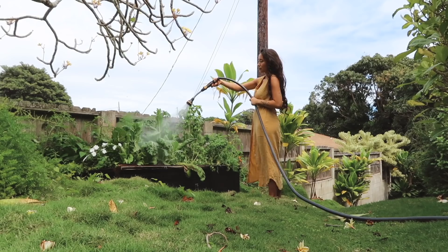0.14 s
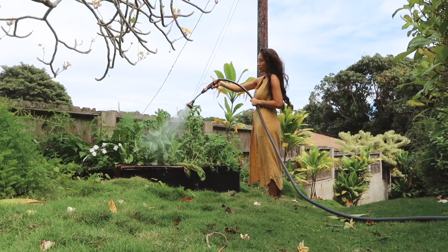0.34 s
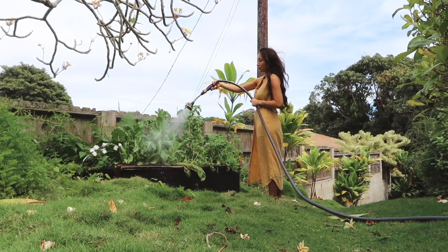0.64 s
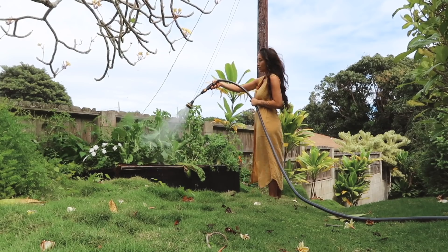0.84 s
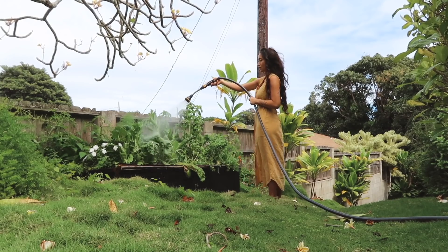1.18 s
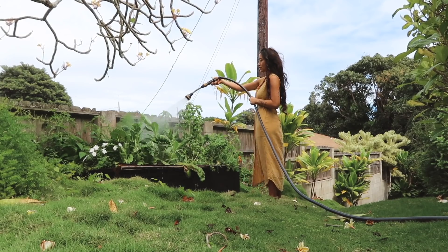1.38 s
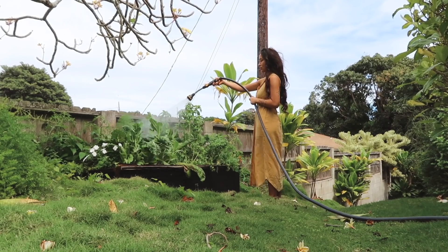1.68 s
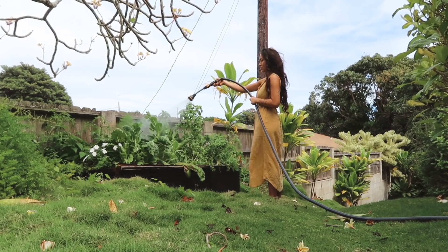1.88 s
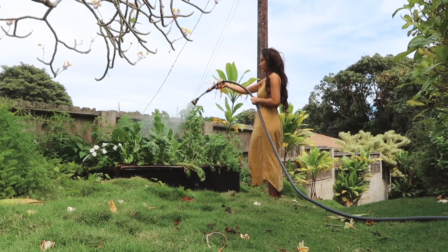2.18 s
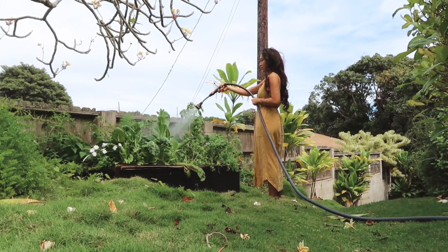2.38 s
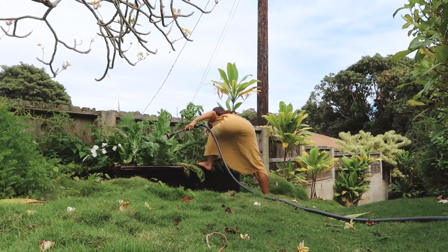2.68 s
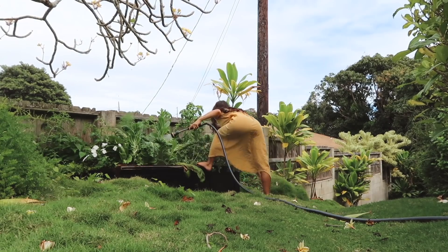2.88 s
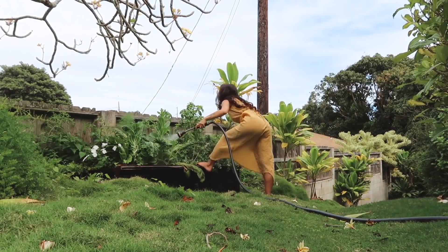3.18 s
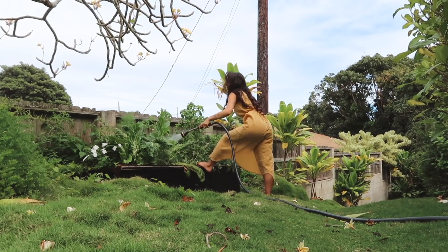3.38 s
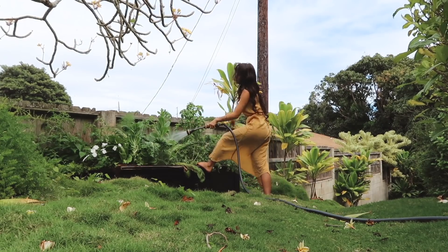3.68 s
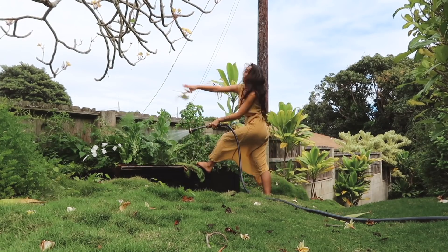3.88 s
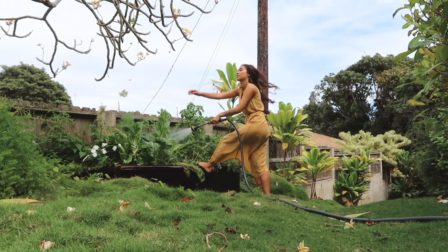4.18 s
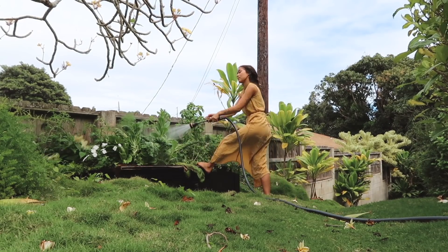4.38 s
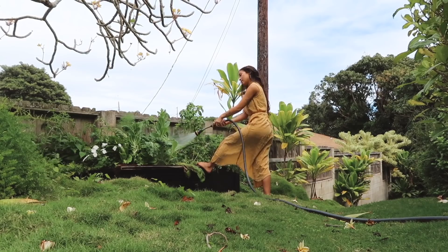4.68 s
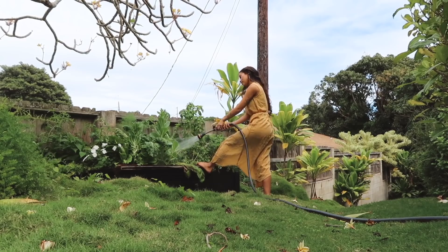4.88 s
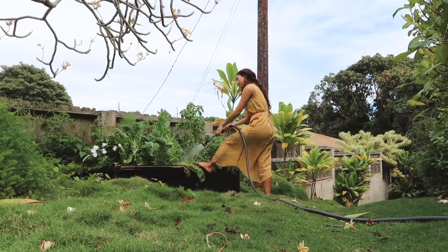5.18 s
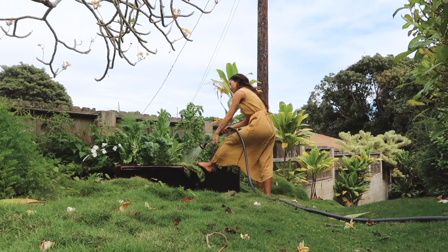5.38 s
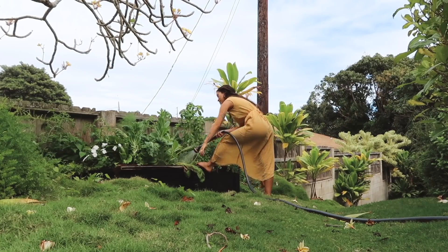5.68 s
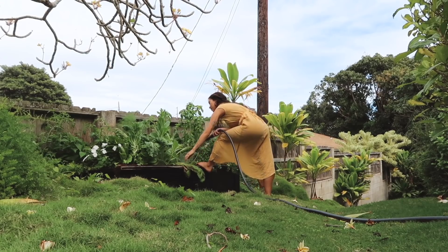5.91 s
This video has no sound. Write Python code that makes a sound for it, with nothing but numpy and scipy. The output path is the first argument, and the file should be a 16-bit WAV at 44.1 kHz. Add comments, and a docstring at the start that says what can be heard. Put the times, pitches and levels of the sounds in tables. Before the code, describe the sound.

Water from a hose nozzle patters densely on leafy plants under a fine hiss, then sizzles lower in the bed and thins out.

```python
"""Six seconds in a garden: a hose nozzle sprays leafy plants a few metres from the microphone.
From the start drops patter on leaves, a noise of random impacts, under hissing mist; fat drops slap, as short rings.
Far traffic rumbles, a filtered noise, with thin whines, engine notes that swell and sink, and puffs of wind.
Past four seconds the nozzle dips: the jet sizzles in the bed, resonances on dense impacts, and then the patter thins."""
import sys
import numpy as np
from scipy import signal
from scipy.fft import rfft, irfft
from scipy.io import wavfile
from scipy.ndimage import uniform_filter1d

SR = 44100
rng = np.random.default_rng(int(sys.argv[2]) if len(sys.argv) > 2 else 0)


def transcribe(u):
    """Save the signal u as a 16-bit wav file named by the first command-line argument.

    u: samples, shape (n,) or (channels, n), limited to [-1, 1]; the rate is SR.
    q: integer samples, one column per channel.
    """
    v = np.clip(np.atleast_2d(u).T, -1, 1)
    q = np.round(v * 32767).astype(np.int16)
    wavfile.write(sys.argv[1], SR, q)


N = 266760  # samples


def gain_of(db):
    """Decibels to amplitude."""
    return 10 ** (np.asarray(db) / 20)


def evened(x):
    """Scales to rms 1."""
    return x / np.sqrt(np.mean(x ** 2) + 1e-20)


def read(points, hz):
    """Reads a spectrum table on a log-frequency axis."""
    f, value = np.transpose(points)
    return np.interp(np.log(hz + 1), np.log(f + 1), value)


def follow(rows, t=None):
    """The columns of a curve at the times t, by default at every sample."""
    s, *columns = np.transpose(rows)
    if t is None:
        t = np.arange(N) / SR
    return [np.interp(t, s, column) for column in columns]


def wander(hz):
    """Slow chance of rms 1, up to about hz changes a second."""
    f = np.fft.rfftfreq(N, 1 / SR)
    spectrum = rfft(rng.standard_normal(N)) / (1 + (f / hz) ** 4)
    return evened(irfft(spectrum, N))


def coloured(x, colour):
    """Gives a sound a spectrum, at rms 1."""
    gain = gain_of(read(colour, np.fft.rfftfreq(N, 1 / SR)))
    return evened(irfft(rfft(x) * gain, N))


def pair(x, same):
    """Two unrelated sounds become left and right, from alike (1) through unrelated (0) to opposite (-1)."""
    likeness = np.clip(read(same, np.fft.rfftfreq(N, 1 / SR)), -1, 1)
    mid = rfft(x[0]) * np.sqrt(1 + likeness)
    side = rfft(x[1]) * np.sqrt(1 - likeness)
    return irfft(np.array([mid + side, mid - side]), N)


def drops(per_s, spread_db):
    """Random impacts: a positive spread makes a few larger than the rest, a negative one a few smaller."""
    size = gain_of(spread_db * np.minimum(rng.exponential(1, N), 5))
    sign = rng.choice([-1, 1], N)
    lands = rng.random(N) < per_s / SR
    return evened(size * sign * lands)


def resonate(x, hz, width):
    """A resonance of gain 1, width in Hz, that follows the curve hz."""
    turn = np.exp(2j * np.pi * np.cumsum(hz * np.ones(N)) / SR)
    r = np.exp(-np.pi * width / SR)
    # shift the resonance down to 0 Hz, smooth there, and shift back
    return 2 * (turn * signal.lfilter([1 - r], [1, -r], x / turn)).real


def steadied(x, size=1500):
    """Takes the chance swells out of a pair of sounds, over size samples, so that an envelope can shape them."""
    return x / np.sqrt(uniform_filter1d((x ** 2).mean(0), size=size) + .02)


def swell(start, length):
    """A far sound rises and sinks as a half sine to a low power, so it holds broadly between."""
    along = np.clip((np.arange(N) / SR - start) / length, 0, 1)
    return (np.abs(np.sin(np.pi * along)) * (along < 1)) ** 0.23


def traffic():
    """A dull roar from far roads, filtered noise that dips, builds up and then holds."""
    # roar at the microphone: t/s, level/dB
    roar_level = [(0, -47.5), (.55, -51), (.9, -45), (2.8, -40), (4.6, -40), (6.05, -40)]
    # spectrum of the roar: f/Hz, level/dB per Hz (relative)
    roar_colour = [(20, -31.5), (45, -21.5), (70, -8), (110, 0.5), (160, 0.5), (250, -2), (330, -8),
                   (450, -7), (580, -19), (720, -17), (900, -17), (1400, -15.5), (3000, -60.5)]
    # left-right likeness of the roar: f/Hz, likeness
    roar_same = [(60, 1), (130, 0.99), (290, 0.93), (630, 0.45), (1000, 0.89), (1400, 1), (3000, 0.97)]
    roar = coloured(pair(rng.standard_normal((2, N)), roar_same), roar_colour)
    return roar * gain_of(follow(roar_level)[0])


def wind(lumpy_db=3):
    """Soft low buffeting, filtered noise: an uneven breeze and a few short puffs."""
    # spectrum of the breeze: f/Hz, level/dB per Hz (relative)
    breeze_colour = [(10, 6), (25, 1), (45, 11.5), (70, 17), (105, 12.5), (150, 7.5), (300, -66.5)]
    # spectrum of the puffs: f/Hz, level/dB per Hz (relative)
    puff_colour = [(10, -8), (30, -6), (55, -3), (95, 6), (150, -1), (200, -10), (330, -64)]
    # wind at the two microphone ports: f/Hz, left-right likeness
    port_same = [(30, .992), (100, .982)]
    # puffs on the microphone: t/s of the peak, level/dB
    gusts = [(.1, -46), (.2, -38.5), (2.3, -40), (2.62, -41), (2.76, -44), (2.885, -44), (3.41, -47),
             (4.5, -47), (4.85, -52), (5.68, -43)]
    rise_s, fall_s = 0.048, 0.0091
    t = np.arange(N) / SR
    breeze_db = np.interp(t, [.6, 2], [-64, -49])  # very faint, then picks up and holds
    force = gain_of(breeze_db + lumpy_db * wander(hz=11.0))
    puffs = np.zeros(N)
    for peak_s, level_db in gusts:
        width_s = np.where(t < peak_s, rise_s, fall_s)
        puffs += gain_of(level_db) * np.exp(-((t - peak_s) / width_s) ** 2)
    breeze, eddies = (pair(air, port_same) for air in rng.standard_normal((2, 2, N)))
    return coloured(breeze, breeze_colour) * force + steadied(coloured(eddies, puff_colour)) * puffs


def lulled(x):
    """The deep part of the rumble drops away for moments, and once lifts."""
    # brief changes below the corner: t/s of the middle, half-width/s (to 1/e of the dB), gain/dB
    lulls = [(.37, 0.099, -5), (.63, .04, 3), (2.426, 0.074, -19), (3.567, .04, -2)]
    below_hz = 60
    t = np.arange(N) / SR
    change_db = sum(db * np.exp(-((t - s) / width_s) ** 2) for s, width_s, db in lulls)
    deep = signal.sosfiltfilt(signal.butter(2, below_hz, fs=SR, output="sos"), x)
    return x + deep * (gain_of(change_db) - 1)


def engines(waver_db=0.5, overtone_db=-14):
    """The firing notes of far engines, each with one overtone, wavering on their way through the air."""
    # far engines: start t/s, length/s, mean firing rate f/Hz, level/dB
    passes = [(.73, 0.13, 146.8, -47), (1.104, .16, 149, -42), (1.272, .17, 148, -39.5),
              (1.534, 0.11, 148, -40), (1.688, .12, 150, -45.5), (2.98, 0.16, 127, -43),
              (3.327, 0.099, 122, -46), (3.79, 0.093, 127, -42.5), (3.97, .14, 143, -43),
              (4.355, .17, 153, -45), (4.996, 0.24, 155, -46.5), (5.364, 0.14, 163.4, -40)]
    turns = np.cumsum(1 + .035 * wander(hz=30)) / SR  # the shared waver of pitch
    out = np.zeros(N)
    for start, length, hz, level_db in passes:
        phase = 2 * np.pi * hz * turns
        note = evened(np.sin(phase) + gain_of(overtone_db) * np.sin(2 * phase))
        out += gain_of(level_db) * swell(start, length) * note
    return out * evened(gain_of(waver_db * wander(hz=35)))


def whines(waver_db=1.5):
    """Thin sine tones that swell out of the far traffic, some sliding in pitch, and sink back."""
    # faint whines: start t/s, length/s, starting f/Hz before drift, glide/(Hz per s), peak level/dB before waver
    glides = [(.2, .14, 485, -17, -50), (0.284, 0.14, 700, 88, -50), (0.49, 0.22, 1055, -58, -46),
              (0.744, .25, 409, -55.5, -46), (.93, .15, 1020, 0, -49), (0.972, 0.25, 720, 10.5, -54),
              (1.12, 0.16, 482, 4, -51), (1.6, 0.11, 673, -520, -48), (1.572, 0.2, 734, -150, -49.5),
              (1.668, 0.25, 1000, 1, -48.5), (1.797, 0.22, 693, 150.5, -49), (1.919, 0.18, 406, 9, -46.5),
              (2.178, 0.23, 417, 29.5, -48.5), (2.6, .55, 439, 2.5, -54), (4.45, 0.21, 466, 2, -51.5)]
    t = np.arange(N) / SR
    tones = np.zeros(N)
    drift = 1 + .011 * wander(hz=22)
    for start, length, hz, glide, level_db in glides:
        turns = np.cumsum((hz + glide * (t - start)) * drift) / SR
        tones += gain_of(level_db) * swell(start, length) * np.sin(2 * np.pi * turns)
    return tones * evened(gain_of(waver_db * wander(hz=11)))


def mist(flutter_db=1.5, fine_hz=7500, brighten=0.86, dull_below_db=-41.5):
    """The jet tears into fine drops: a wide hiss, louder and brighter when the nozzle faces the microphone."""
    # hiss as the nozzle turns, before flutter and the water's trim: t/s, level/dB
    hiss_level = [(0, -43), (.45, -38.5), (.75, -40.5), (1.1, -38), (1.32, -40.5), (1.6, -41), (2.1, -42),
                  (2.25, -43), (2.6, -42), (3.4, -40), (3.82, -39), (4, -41.5), (4.4, -37.5), (4.52, -41),
                  (4.8, -40), (4.95, -40), (5.1, -38), (5.3, -44), (5.48, -42), (5.56, -41), (5.66, -42.5),
                  (5.88, -41.5), (5.98, -45.5), (6.05, -44)]
    # spectrum of the hiss before brightening: f/Hz, level/dB per Hz (relative)
    hiss_colour = [(1500, -46.5), (3200, -40), (3900, 14.5), (5600, 12), (7000, 8.5), (9500, 4.5),
                   (12300, 2), (14000, -3), (15000, -10)]
    # left-right likeness of the hiss, limited to -1..1: f/Hz, likeness
    hiss_same = [(3000, 0.5), (6000, -0.31), (8500, -0.59), (10500, -1.062), (12000, -1.08), (13500, -0.82),
                 (15000, -1)]
    spray = [drops(per_s=11000, spread_db=1.5), drops(per_s=14000, spread_db=1.5)]
    hiss = coloured(pair(spray, hiss_same), hiss_colour)
    fine = signal.sosfiltfilt(signal.butter(2, fine_hz, "high", fs=SR, output="sos"), hiss)
    level_db = follow(hiss_level)[0]
    fine_db = brighten * (level_db - dull_below_db)  # treble gain, dB
    bright_hiss = hiss + fine * (gain_of(fine_db) - 1)
    return bright_hiss * gain_of(level_db + flutter_db * wander(hz=28.8))


def sizzle(width=1250, sputter_db=0.9, hop=0.013, bubble_share=.38, fizz_db=-31):
    """Lowered to the bed, the jet sputters, bubbles and fizzes on a small patch, whose pitch glides as it moves."""
    # jet striking the bed from close by, before sputter and hop: t/s, level/dB, resonance f/Hz
    strikes = [(4.2, -59, 2770), (4.33, -34, 2750), (4.42, -31.5, 2770), (4.52, -40, 2730),
               (4.65, -47, 2920), (4.71, -33, 2980), (4.76, -45, 3240), (4.805, -35, 3920),
               (4.84, -40, 2760), (4.88, -50, 2870), (4.965, -41, 2900), (4.995, -32.5, 3350),
               (5.05, -32, 3370), (5.15, -32, 3500), (5.19, -48, 3460), (5.245, -31, 3540),
               (5.29, -55, 3230), (5.37, -40, 3160), (5.46, -41, 3200), (5.51, -45, 3390),
               (5.555, -34.5, 4130), (5.61, -36, 3650), (5.645, -38, 3520), (5.685, -34.5, 3550),
               (5.73, -39, 3900), (5.79, -35.5, 3880), (5.88, -41, 3900), (5.97, -54, 3440)]
    # spectrum of the fizz: f/Hz, level/dB per Hz (relative)
    fizz_colour = [(4000, -49), (8000, -5), (9500, -4), (11000, -25), (13000, 1), (15000, -7)]
    cut_hz = 4680  # the bed's foliage swallows the patch's treble above this
    level_db, hz = follow(strikes)
    hz = hz * (1 + hop * wander(hz=30))
    hits = resonate(resonate(drops(per_s=9000, spread_db=-0.5), hz, width), hz, width)
    bubbles = np.zeros(N)
    for ratio in np.linspace(.85, 1.17, 10):
        bubbles += resonate(drops(per_s=110, spread_db=1), hz * ratio, width=80)
    patch = np.sqrt(1 - bubble_share) * evened(hits) + np.sqrt(bubble_share) * evened(bubbles)
    patch = signal.sosfilt(signal.butter(12, cut_hz, fs=SR, output="sos"), patch)
    fizz = gain_of(fizz_db) * coloured(drops(per_s=6500, spread_db=-0.5), fizz_colour)
    return gain_of(level_db + sputter_db * wander(hz=40)) * (evened(patch) + fizz)


def slaps(rough=.3):
    """A fat drop makes one leaf ring for a few cycles, with a rough edge."""
    # fat drops, each on a single leaf: start t/s, envelope peak level/dB, leaf pitch f/Hz
    fat_drops = [(.183, -23, 2890), (.5482, -23, 2410), (.9188, -26, 2250), (1.02, -24, 2350),
                 (1.51, -32, 2450), (1.6452, -22.5, 2830), (3.2141, -25, 2370), (3.3832, -30, 2260),
                 (3.928, -26.5, 2060), (4.2872, -26, 2370), (4.6433, -27, 2570), (4.8424, -20, 2320),
                 (4.9901, -21, 2680)]
    peak_s = 0.0014  # a slap peaks after this time, then dies away
    t = np.arange(1024) / SR
    out = np.zeros(N)
    noises = rng.standard_normal((len(fat_drops), len(t)))
    envelope = t / peak_s * np.exp(1 - t / peak_s)
    for (s, peak_db, hz), noise in zip(fat_drops, noises):
        flutter = evened(np.convolve(noise, np.hanning(36), "same"))
        ring = np.sin(2 * np.pi * hz * t) * (1 + rough * flutter)
        out[round(s * SR):][:len(t)] += gain_of(peak_db) * envelope * ring
    return out


def leaves(patchy_db=1.5, flutter_db=0.17, depth=0.77, tap_share=0.29):
    """Drops tap leaves of many sizes over a wash of finer ones; the jet wanders from leaf to leaf."""
    # patter as the jet sweeps the plants, before flutter and the water's trim:
    # t/s, level/dB, weight of the low part/dB before depth (large leaves sound deeper)
    sweep = [(0, -30, -11), (.2, -29, -9.5), (.4, -29.5, -9), (.65, -28, -9.5), (.95, -28.5, -10),
             (1.2, -29, -10), (1.4, -28.5, -8.5), (1.85, -28, -7.5), (2.15, -30, -8), (2.26, -31, -7.8),
             (2.5, -29.5, -7), (2.7, -27.5, -6), (2.95, -29, -5.5), (3.3, -30.5, -8), (3.55, -31.5, -6.5),
             (3.72, -28.5, -7), (4, -29.5, -7.5), (4.42, -30, -7.5), (4.68, -29.5, -8.5),
             (4.84, -28.5, -6.5), (5.02, -28.5, -6.5), (5.13, -28, -8.5), (5.2, -32, -9.5),
             (5.3, -35, -10.5), (5.52, -38, -8.5), (5.75, -38.5, -11), (5.95, -41, -10), (6.03, -38, -5.5)]
    # spectrum of taps and wash before patches and weight: f/Hz, level/dB per Hz (relative)
    leaf_colour = [(50, -34), (160, -8), (500, -14), (700, -12.5), (900, -15), (1150, -12.5), (1500, -7),
                   (1850, -2), (2250, 1), (2750, 0.5), (3400, -2), (4200, -8), (5200, -15), (6500, -22),
                   (8200, -26), (9500, -48), (12000, -73)]
    taps = np.zeros(N)
    for hz in np.geomspace(1200, 8000, 30):
        taps += resonate(drops(per_s=190, spread_db=2.1), hz, width=300)
    wash = coloured(drops(per_s=20000, spread_db=1.77), leaf_colour)
    patter = np.sqrt(tap_share) * coloured(taps, leaf_colour) + np.sqrt(1 - tap_share) * wash
    hz, t, z = signal.stft(patter, SR, nperseg=512, noverlap=384)
    # chance patches, smooth over 3 bands and 12 frames
    patches = uniform_filter1d(rng.standard_normal(z.shape), size=3, axis=0)
    patches = evened(uniform_filter1d(patches, size=12, axis=1))
    # large leaves add weight under the main resonance and take it from above: f/Hz, dB per dB
    tilt = [(600, -1.07), (1050, -1.44), (1400, 0.94), (1800, 1.64), (2600, -0.19), (3700, -0.81), (6000, -0.97)]
    deep_db = follow(sweep, t)[1]
    weight_db = depth * np.outer(read(tilt, hz), deep_db - np.median(deep_db))
    z = z * gain_of(patchy_db * patches + weight_db)
    patter = evened(signal.istft(z, SR, nperseg=512, noverlap=384)[1][:N])
    return patter * gain_of(follow(sweep)[0] + flutter_db * wander(hz=34.8))


def surges():
    """Gain of patter and mist, which swell or dip briefly as the jet meets or misses nearer leaves."""
    # brief swells and dips: t/s of the middle, gain/dB
    moments = [(.19, 0.5), (2.03, -0.5), (2.12, 1.5), (2.72, 0.5), (4.6, 0.5), (4.84, 2), (4.885, -0.5)]
    half_width_s = 0.029  # to 1/e of the dB
    t = np.arange(N) / SR
    return gain_of(sum(db * np.exp(-((t - s) / half_width_s) ** 2) for s, db in moments))


def scene():
    """Water in front, traffic and wind behind."""
    spray = surges() * (gain_of(0.06) * leaves() + gain_of(-0.94) * mist())
    water = spray + sizzle() + slaps()
    return water + lulled(traffic() + wind()) + engines() + whines()


def record(dry):
    """The microphone's band limit: a steep low-pass."""
    edge_hz = 15100
    low_pass = signal.firwin(511, edge_hz, window=("kaiser", 9), fs=SR)
    return signal.oaconvolve(dry, low_pass[None], "same")


dry = scene()
out = record(dry)
transcribe(out)
```